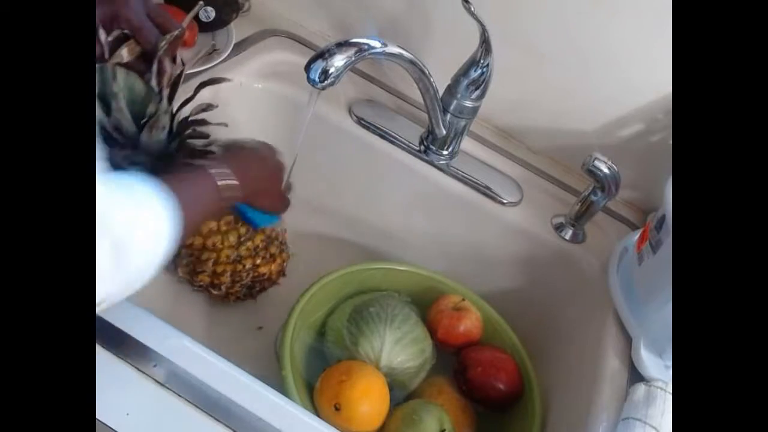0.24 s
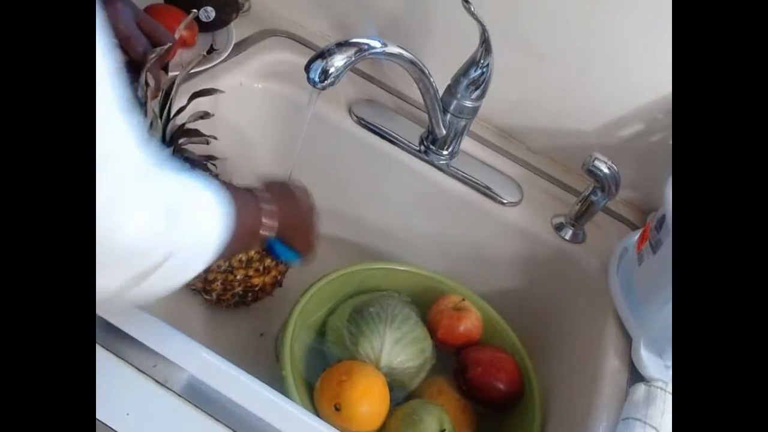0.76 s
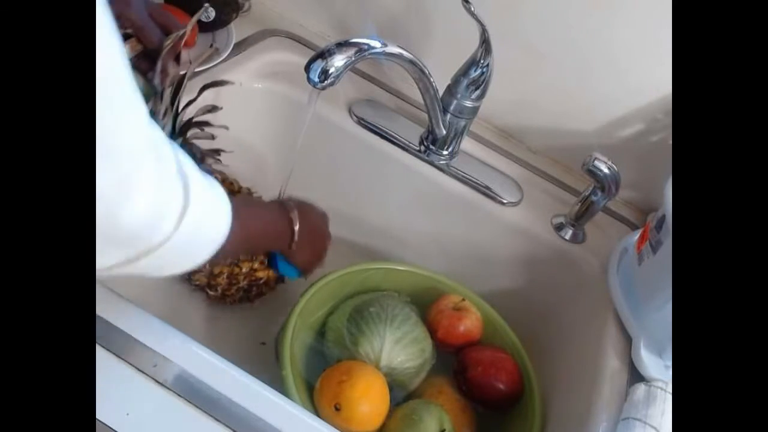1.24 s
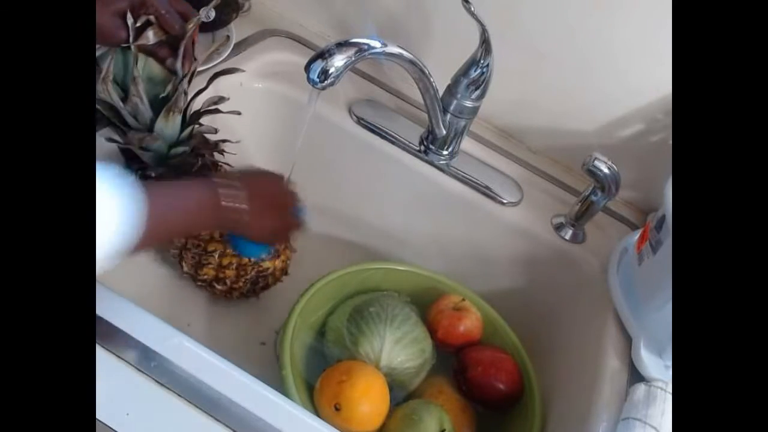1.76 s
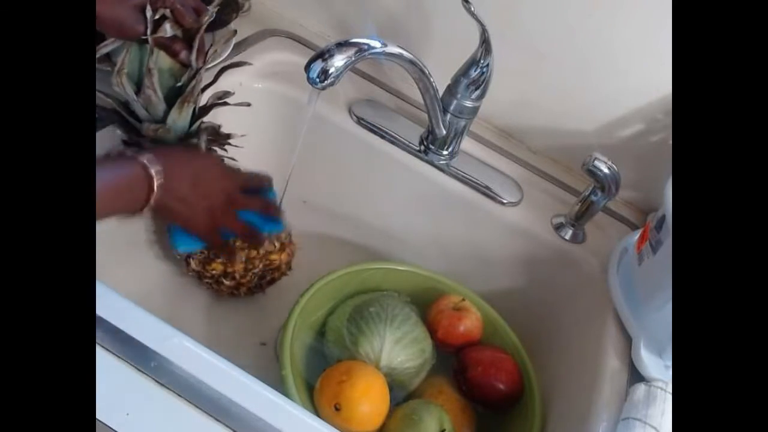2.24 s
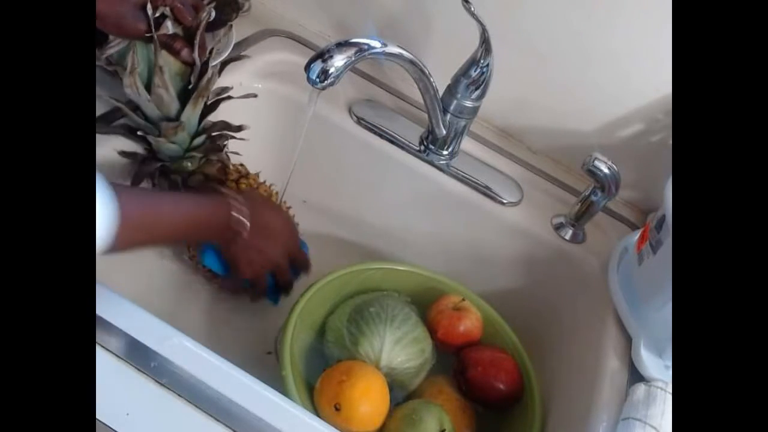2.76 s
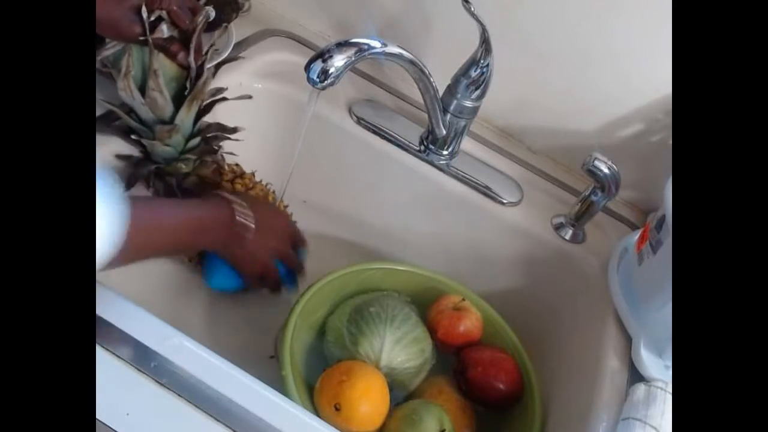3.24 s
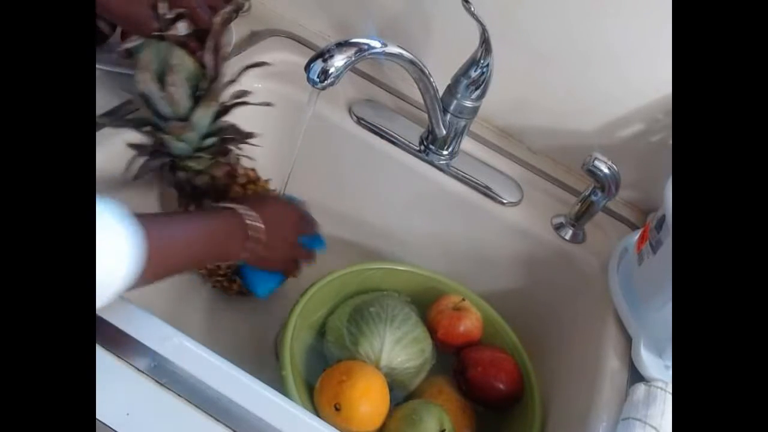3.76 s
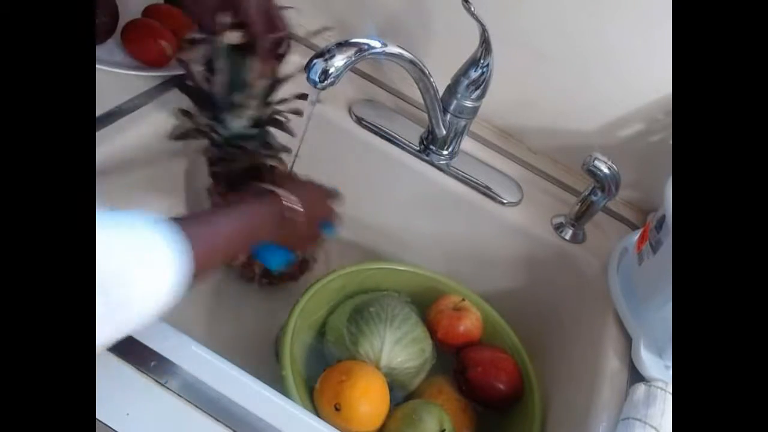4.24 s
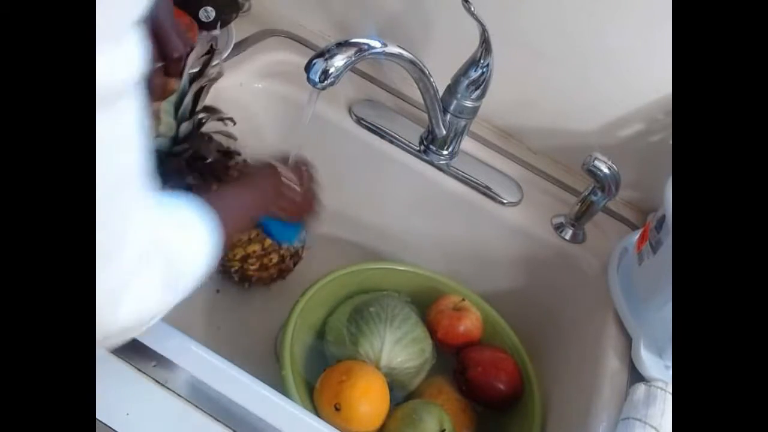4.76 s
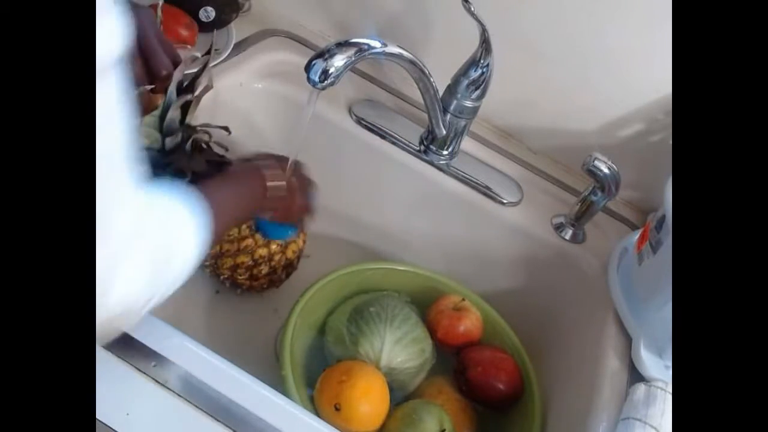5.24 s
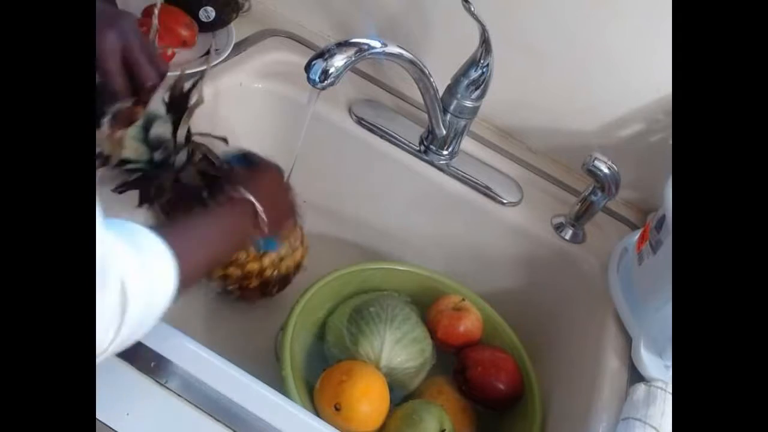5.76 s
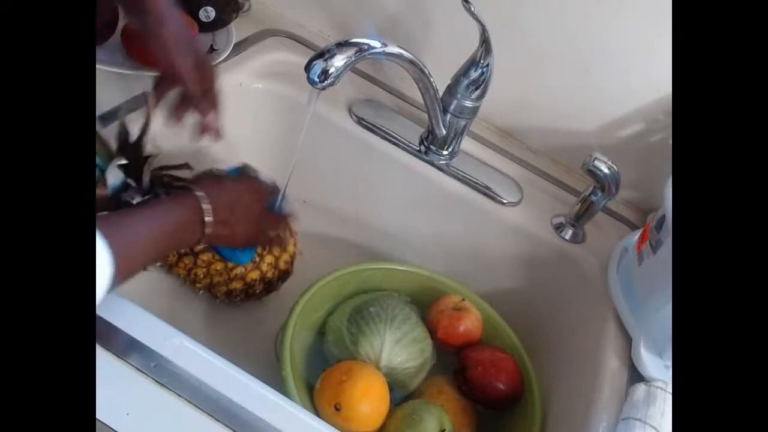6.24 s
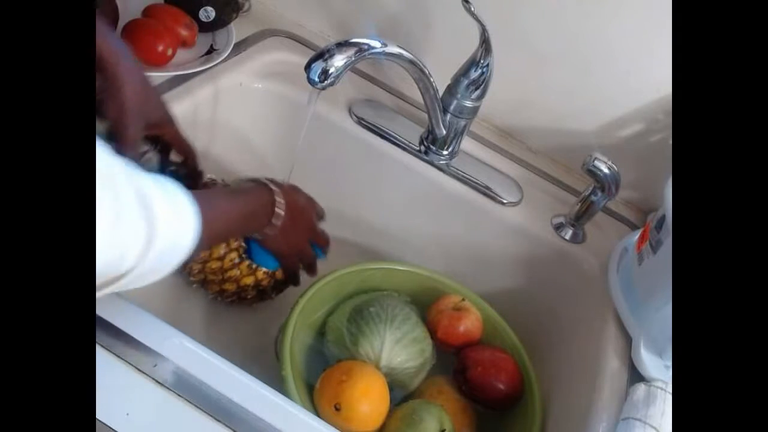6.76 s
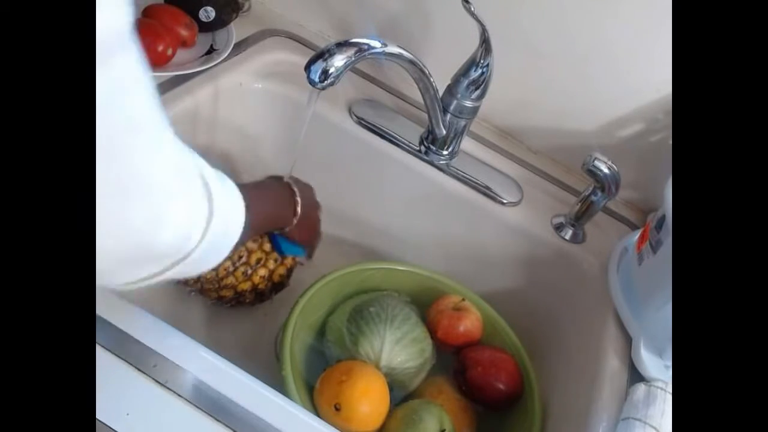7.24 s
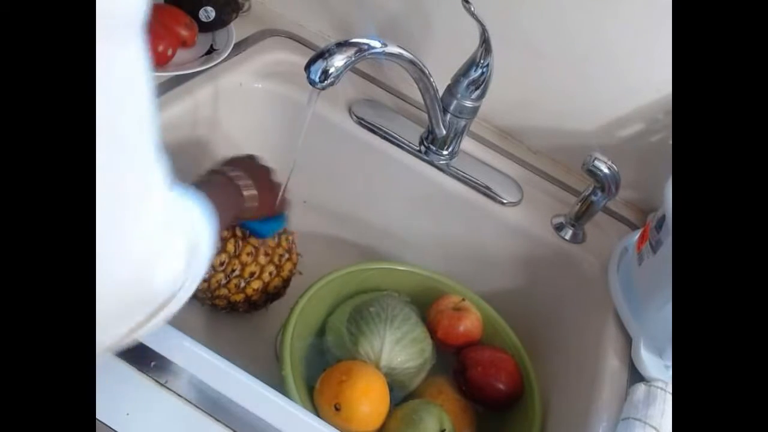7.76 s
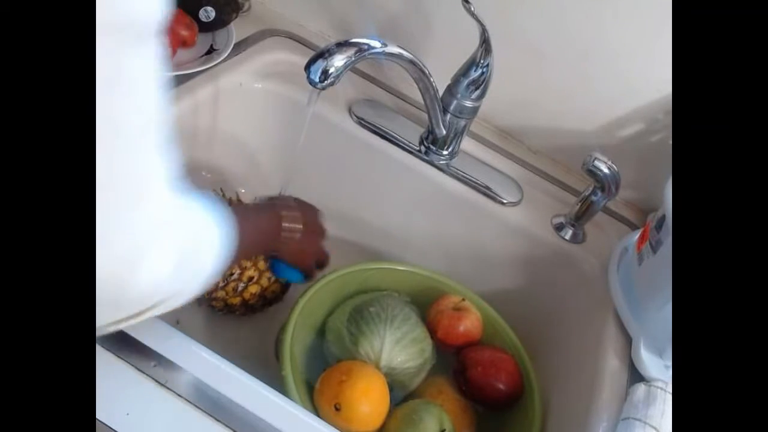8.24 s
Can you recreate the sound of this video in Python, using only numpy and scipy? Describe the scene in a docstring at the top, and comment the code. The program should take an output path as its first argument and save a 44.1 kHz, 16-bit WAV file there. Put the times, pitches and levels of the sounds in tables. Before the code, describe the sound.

Close in a kitchen sink, a small brush scrubs a pineapple's rough skin in fast back-and-forth strokes, strong at first, softer around three to four seconds, then firmer again. Bristles snap, the basin rings dully and shudders, and the fruit knocks twice hard, early and late. Thin tap water patters beneath. Narrow-band, centred, close microphone.

```python
"""A small brush scrubs a pineapple in a kitchen sink, about five strokes a second, under a thin stream from the tap.
Bristles rasp over the scales in clumps of random clicks, and snap off them with short bursts of noise.
The fruit passes the rubbing on to the ringing, shuddering basin, now and then knocks against it, and skids once
as its leaves rustle. The stream is a patter of clicks with small rising bubble tones over a quiet, noisy kitchen.
One close microphone with a narrow band hears it all, the same in both channels."""
import sys
import numpy as np
from scipy import signal
from scipy.fft import rfft, irfft, next_fast_len
from scipy.io import wavfile

SR = 44100
rng = np.random.default_rng(int(sys.argv[2]) if len(sys.argv) > 2 else 0)


def wrap_up_sound(samples):
    """Save the sound to the file named by the first command line argument, as 16-bit audio."""
    columns = np.atleast_2d(samples).T
    # keep every value between -1 and 1, then stretch to whole-number steps
    tamed = np.clip(columns, -1, 1)
    steps = np.round(tamed * 32767).astype(np.int16)
    wavfile.write(sys.argv[1], SR, steps)


N = 374409
T = np.arange(N) / SR  # time of every sample, s
BAND_LIMIT_HZ = 7850

# strokes of the brush; the long faint one at 6.5 s is the leaves rustling:
# middle_s, length_s, force_db (relative)
STROKES_AND_RUSTLE = [(0.118, 0.25, -26), (0.306, 0.19, -32), (0.497, 0.26, -27.5), (0.702, 0.22, -33),
                      (0.89, 0.21, -27), (1.095, 0.32, -34.5), (1.299, 0.18, -30), (1.477, 0.24, -34),
                      (1.683, .21, -29), (1.875, 0.21, -31.5), (2.079, 0.21, -28), (2.29, 0.24, -31),
                      (2.49, 0.22, -31), (2.668, .19, -31.5), (2.844, 0.19, -31.5), (3.02, 0.16, -35.5),
                      (3.2, 0.22, -34), (3.376, 0.19, -38.5), (3.553, .16, -37.5), (3.723, 0.19, -39),
                      (3.873, .17, -39), (4.027, 0.17, -36.5), (4.178, .18, -37.5), (4.403, 0.19, -39.5),
                      (4.645, 0.38, -33), (4.879, .19, -35), (5.106, 0.34, -30), (5.347, 0.21, -32.5),
                      (5.56, 0.25, -30), (5.761, .22, -33.5), (5.922, .14, -31), (6.1, 0.42, -41),
                      (6.504, 0.72, -46.5), (6.748, 0.11, -35), (6.851, 0.16, -31), (7.066, 0.34, -38.5),
                      (7.287, 0.31, -35), (7.503, .22, -32.5), (7.693, .22, -28.5), (7.896, 0.28, -37),
                      (8.121, 0.28, -29.5), (8.423, 0.51, -39.5)]
# the loudest snaps of a tuft of bristles off a scale: start_s, level_db (relative), pitch_hz
LOUD_SNAPS = [(0.079, -15, 3560), (0.668, -23, 4900), (0.729, -19.5, 4650), (0.914, -15.5, 5300),
              (2.027, -19.5, 5000), (2.599, -24.5, 5440), (2.692, -19, 2700), (2.86, -17.5, 3280),
              (3.19, -19.5, 3420), (3.98, -23.5, 4960), (4.042, -21.5, 5200), (4.437, -23.5, 4900),
              (4.904, -20, 2560), (7.426, -18, 4250), (7.86, -23.5, 4770), (7.899, -26, 5670),
              (7.902, -17, 1490)]
# bumps of the fruit on the basin; the low close run near 6.4 s is the fruit skidding:
# start_s, peak_db, highest_pitch_hz
KNOCKS_AND_SKID = [(0.3114, -11.5, 1080), (0.364, -26.5, 2130), (0.893, -21.5, 745), (3.781, -27, 1020),
                   (4.344, -22.5, 1000), (4.355, -24, 570), (6.329, -41, 450), (6.391, -39, 450),
                   (6.415, -35.5, 440), (6.439, -30, 1980), (6.446, -32, 400), (7.402, -12, 1100),
                   (8.223, -31, 400)]
# ringing tones (modes) of the basin: pitch_hz, level_db (relative), ring_s (time to fade 60 dB at damping 1)
BASIN_TONES = [(183, -18.5, 0.42), (276, -7, 0.13), (397, 1, .11), (469.4, 3, 0.046), (523, 2.5, 0.074),
               (602, -7.5, 0.1), (686.4, -11.5, 0.21), (711, -20, 0.13), (880, -15.5, .06),
               (967, 2.5, 0.067), (1030, -7, 0.032), (1330, -22.5, 0.029), (1540, -4.5, 0.19),
               (1609, 1.5, 0.085)]
# colour of the bristles' rasp: pitch_hz, level_db (relative)
RASP_COLOUR = [(200, -35), (500, -6.5), (1000, -9.5), (1900, -5.5), (2650, 0), (3100, -2.5), (3700, -1),
               (4500, -2), (5250, -0.5), (6200, -4.5), (7400, -5), (8200, -15.5)]
# colour of the rub passed into the fruit: pitch_hz, level_db (relative)
RUB_COLOUR = [(70, -23.5), (120, -18.5), (180, -5), (250, -9), (400, -1), (700, 1.5), (1300, -6.5),
              (2000, -11.5), (4000, -19)]
# colour of the sink's low shudder: pitch_hz, level_db (relative)
SHUDDER_COLOUR = [(15, -22), (28, -9), (36, 4.5), (45, -4), (56, -0.5), (70, -13.5), (110, -26.5),
                  (250, -34)]
# colour of the stream's splash: pitch_hz, level_db (relative)
SPLASH_COLOUR = [(300, -20.5), (700, -12), (1400, -12.5), (2000, -2.5), (2600, -0.5), (3600, -2),
                 (5300, -1.5), (7200, 2.5), (8200, -6.5)]
# colour of the stream drumming on the basin: pitch_hz, level_db (relative)
DRUMMING_COLOUR = [(110, -26.5), (250, -17), (450, 3), (700, -1.5), (1000, 2.5), (1500, 3), (2500, -6.5)]
# colour of the quiet kitchen: pitch_hz, level_db (relative)
KITCHEN_COLOUR = [(30, -3), (60, -4.5), (110, -12.5), (180, -9), (400, -4), (900, -17)]
# drumming of the stream on the basin, weak while the turned fruit shields it: time_s, level_db
DRUMMING_LEVEL = [(0, -47), (4.0, -51), (4.12, -79), (4.28, -57), (4.42, -52.5), (6.1, -48.5),
                  (6.28, -53.5), (8.49, -52.5)]
# how firmly the fruit rests on the basin; it is lifted and turned twice: time_s, rub_passed_on_db
FRUIT_CONTACT = [(0, 0.5), (1.5, 0), (1.9, -4.5), (2.45, -3), (2.7, -8.5), (3.05, -7.5), (3.55, 0),
                 (4.03, -6), (4.15, -34.5), (4.45, -7), (4.7, -2), (5.35, -3.5), (6.1, -5.5), (6.55, -21.5),
                 (6.8, -7), (7.05, -11), (7.25, -0.5), (8.49, -2)]
# shudder of the sink under an outward stroke, compared with the stroke's force: time_s, level_db
SHUDDER_OVER_FORCE = [(0, -17), (1.0, -14), (1.8, -7), (2.9, -13), (3.85, -8), (4.15, -35), (4.7, -19),
                      (5.55, -14.5), (6.1, -6.5), (6.8, -30), (7.6, -10), (8.49, -7)]

# lesser snaps come by chance, as strong as the stroke under way allows
SNAPS_PER_S, SNAP_OVER_STROKE_DB, TUFT_LOW_HZ, TUFT_HIGH_HZ = 2.7, 5, 2500, 6160
TUFT_Q = 6  # how narrowly a snapping tuft keeps to its pitch
# the brush goes out and back by turns; coming back it bears less on the fruit
RETURN_RUB_DB, RETURN_SHUDDER_DB = -2.5, -10
# in a knock a second scale lands just after the first, with a share of its blow
SECOND_TOUCH_S, SECOND_SHARE = 0.0021, 0.5


def gain_of(db):
    """Turns decibels into amplitude."""
    return 10 ** (np.asarray(db) / 20)


def evened(x):
    """Scales a sound to an average (rms) level of 1."""
    return x / np.sqrt(np.mean(x ** 2) + 1e-20)


def gain_over_time(points):
    """Joins rows of time and decibels into a gain for every sample."""
    times, db = np.transpose(points)
    return gain_of(np.interp(T, times, db))


def add(mix, s, sound):
    """Mixes a sound in at time s, in seconds."""
    part = mix[round(s * SR):][:len(sound)]
    part += sound[:len(part)]


def coloured(x, points):
    """Filters x to the levels in the rows, falling away steeply above the last pitch."""
    size = next_fast_len(len(x))
    hz = np.fft.rfftfreq(size, 1 / SR)
    pitch, db = np.transpose(points)
    gain = gain_of(np.interp(np.log(hz + 1), np.log(pitch), db))
    top_cut = 1 + (hz / pitch[-1]) ** 20
    return irfft(rfft(x, size) * gain / top_cut, size)[:len(x)]


def wander(rate):
    """Makes a smooth random curve of rms 1, mostly slower than rate in Hz."""
    slow_t = T[::32]
    slow_hz = np.fft.rfftfreq(len(slow_t), slow_t[1])
    noise = rfft(rng.standard_normal(len(slow_t)))
    slow = irfft(noise / (1 + (slow_hz / rate) ** 2), len(slow_t))
    return np.interp(T, slow_t, evened(slow))


def clicks(per_s, spread_db):
    """Scatters clicks of either sign at random; a larger spread makes their sizes less alike."""
    size = gain_of(spread_db * np.minimum(rng.exponential(1, N), 4))
    sign = rng.choice([-1., 1.], N)
    return size * sign * (rng.random(N) < per_s / SR)


def quiet_kitchen(level_db=-66):
    """The room's faint background is steady noise with its own colour."""
    return gain_of(level_db) * evened(coloured(rng.standard_normal(N), KITCHEN_COLOUR))


def water_bubbles(bubbles_per_s=7, cycles=9, glide=0.041):
    """Small bubbles ring at random moments, each a fading tone that rises a little in pitch."""
    bubbles = np.zeros(N)
    for hz in np.geomspace(2300, 7000, num=14):
        # age counts fading times: in each, the tone swings about "cycles" times and fades to about a third
        age = np.arange(int(2 * np.pi * cycles * SR / hz)) * hz / (cycles * SR)
        ping = np.exp(-age) * np.sin(2 * np.pi * cycles * age * (1 + glide * age / 2))
        bubbles += np.sqrt(hz) * signal.oaconvolve(clicks(bubbles_per_s, spread_db=6.0), ping)[:N]
    return evened(bubbles)


def tap_water(splash_db=-46, bubble_db=-54, waver_db=3.5):
    """The thin stream patters on fruit and basin as many random drops, and small bubbles ring in it."""
    splash = evened(coloured(clicks(per_s=6000, spread_db=1.5), SPLASH_COLOUR))
    splash = splash * gain_of(waver_db * wander(rate=44))
    drumming = evened(coloured(clicks(per_s=1500, spread_db=3.0), DRUMMING_COLOUR))
    drumming = drumming * gain_over_time(DRUMMING_LEVEL)
    return gain_of(splash_db) * splash + drumming + gain_of(bubble_db) * water_bubbles()


def reflections(x, wet_db=-10, t60=0.093, count=3):
    """The walls of the sink throw back quick echoes, whose paths change as the arm moves."""
    t, out = np.arange(SR // 4) / SR, np.zeros(N)
    paths = np.array([wander(rate=3.2) for _ in range(count)])
    for share in paths / np.linalg.norm(paths, axis=0):
        fade = np.exp(-np.log(1000) * t / t60) * (t > .001)  # no echo in the first millisecond
        echoes = clicks(per_s=2200, spread_db=-2.5)[:len(t)] * fade
        out += signal.oaconvolve(x * share, echoes / np.linalg.norm(echoes))[:N]
    return gain_of(wet_db) * out


def basin_modes(damping):
    """Each tone of the basin answers a click with a fading sine, one row a tone; damping speeds the fade."""
    t, rows = np.arange(SR // 4) / SR, []
    for k, (hz, db, t60) in enumerate(BASIN_TONES):
        fade = np.exp(-np.log(1000) * damping * t / t60)
        rows.append(gain_of(db) * fade * np.sin(2 * np.pi * hz * t) * (-1) ** k)  # signs alternate
    return np.array(rows)


def basin_ring(drive, damping=0.98, shift_db=10.0):
    """As the fruit shifts on the basin, it feeds now one ringing tone, now another."""
    ring = np.zeros(N)
    for mode in basin_modes(damping):
        feed = gain_of(shift_db * np.tanh(wander(rate=6.2)))
        ring += signal.oaconvolve(drive * feed, mode)[:N]
    return evened(ring) * np.std(drive)


def knocks_and_skid(damping=0.63, tilt=0.47, rock_s=0.00862, rock_share=0.31):
    """Fruit lands on two scales and rocks once; harder spots wake higher tones; a skid is a run of low blows."""
    out, ring = np.zeros(N), basin_modes(damping).sum(0)
    hz = np.fft.rfftfreq(len(ring), 1 / SR)
    # each later touch is a delayed, weaker copy of the blow
    second = 1 + SECOND_SHARE * np.exp(-2j * np.pi * hz * SECOND_TOUCH_S)
    rock = 1 + rock_share * np.exp(-2j * np.pi * hz * rock_s)
    struck = irfft(rfft(ring) * second * rock * hz ** tilt)  # tilt favours the higher tones
    for s, db, top_hz in KNOCKS_AND_SKID:
        blow = signal.butter(4, [top_hz / 4, top_hz], "bandpass", fs=SR, output="sos")
        knock = signal.sosfilt(blow, struck)[:SR // 5]
        add(out, s, gain_of(db) * knock / abs(knock).max())
    return out


def stroke_level(lag, lean_db, return_db=0, sharpness=1.716):
    """The hand speeds up and slows to a stop, so each stroke swells in an arch; the leaves' rustle does too."""
    level = np.zeros(N)
    for k, (middle, length, force_db) in enumerate(STROKES_AND_RUSTLE):
        u = np.linspace(-.5, .5, max(round(length * SR), 2))  # place within the row's sound
        # a negative lean favours the start; every second row gets the return level
        db = force_db + lean_db * u + return_db * (k % 2)
        arch = abs(np.cos(np.pi * u)) ** sharpness * gain_of(db)
        level += np.interp(T, middle + lag + u * length, arch, 0, 0)
    return level


def lesser_snaps():
    """Draws more snaps at random moments, each as strong as the level of the strokes allows."""
    force_db = 20 * np.log10(stroke_level(lag=0, lean_db=1.5) + 1e-6)
    at = np.flatnonzero(rng.random(N) < SNAPS_PER_S / SR)
    pitch = TUFT_LOW_HZ * (TUFT_HIGH_HZ / TUFT_LOW_HZ) ** rng.random(len(at))
    return list(zip(T[at], force_db[at] + SNAP_OVER_STROKE_DB, pitch))


def snaps(level_db=-10, crack_db=-1.5, crack_s=0.0027, length_s=0.049, broad_share=0.53):
    """A bent tuft lets go: one crack, then a short volley of noise around the tuft's own pitch."""
    out, t = np.zeros(N), np.arange(SR // 10) / SR
    crack = gain_of(crack_db) * np.exp(-t / crack_s)
    tail = gain_of(level_db) * np.exp(-np.pi * t / length_s)
    shape = np.maximum(tail, crack)
    for s, db, hz in list(LOUD_SNAPS) + lesser_snaps():
        volley = coloured(rng.standard_normal(len(t)), RASP_COLOUR)
        ringing = signal.lfilter(*signal.iirpeak(hz, TUFT_Q, fs=SR), volley)
        blend = broad_share * evened(volley) + (1 - broad_share) * evened(ringing)
        add(out, s, gain_of(db) * evened(blend) * shape)
    return out


def bristle_flicks(patch_db=3.0):
    """Tufts flick in ten overlapping pitch ranges, each range swelling and fading at its own moments."""
    size = next_fast_len(N)
    hz, centres = np.fft.rfftfreq(size, 1 / SR), np.linspace(0, BAND_LIMIT_HZ, 10)
    flicks = rfft(clicks(per_s=7000, spread_db=1.5), size)
    tufts = np.zeros(N)
    for centre in centres:
        pitch_range = np.maximum(1 - abs(hz - centre) / centres[1], 0)  # a triangle around the centre
        tufts += irfft(flicks * pitch_range, size)[:N] * gain_of(patch_db * wander(rate=13))
    return tufts


def scrubbing_and_rustle(rasp_db=1.54, rub_db=-1.72, ring_db=-4.0, bump_db=1.25):
    """Flicks clump as the brush crosses scales; the drag shakes fruit and basin; leaves rustle the same way."""
    scales = gain_of(bump_db * wander(rate=26))
    rasp = evened(coloured(bristle_flicks() * scales, RASP_COLOUR)) * stroke_level(lag=0, lean_db=-1.0)
    drag = evened(coloured(clicks(per_s=2600, spread_db=3.0) * scales, RUB_COLOUR))
    rub_level = stroke_level(lag=0.0078, lean_db=-5.5, return_db=RETURN_RUB_DB)
    rub = drag * gain_over_time(FRUIT_CONTACT) * rub_level
    push = stroke_level(lag=.034, lean_db=-1, return_db=RETURN_SHUDDER_DB)
    push = push * gain_over_time(SHUDDER_OVER_FORCE)
    shudder = evened(coloured(rng.standard_normal(N), SHUDDER_COLOUR)) * push
    return gain_of(rasp_db) * rasp + gain_of(rub_db) * rub + gain_of(ring_db) * basin_ring(rub) + shudder


def scene():
    """Brush, leaves and water echo in the sink; knocks, skid and kitchen do not; both channels are alike."""
    echoing = scrubbing_and_rustle() + snaps() + tap_water()
    sound = echoing + reflections(echoing) + knocks_and_skid() + quiet_kitchen()
    return np.array([sound, sound])


def record(dry):
    """The recorder cuts steeply everything above its band limit."""
    low_pass = signal.firwin(201, BAND_LIMIT_HZ, window=("kaiser", 8), fs=SR)
    return signal.oaconvolve(dry, low_pass[None], "same")


dry = scene()
out = record(dry)
wrap_up_sound(out)
```